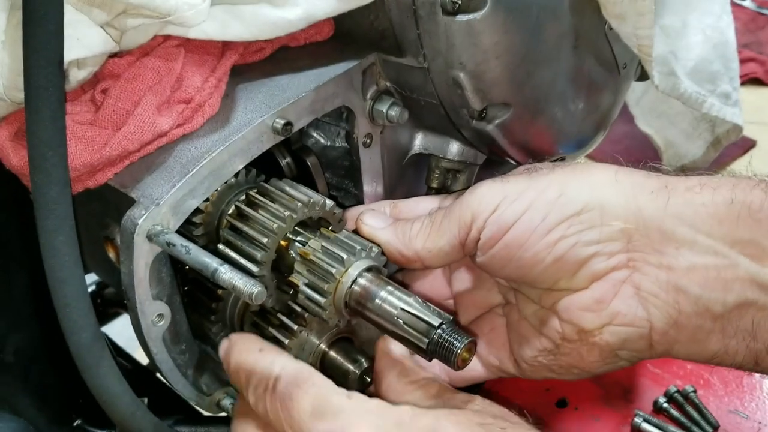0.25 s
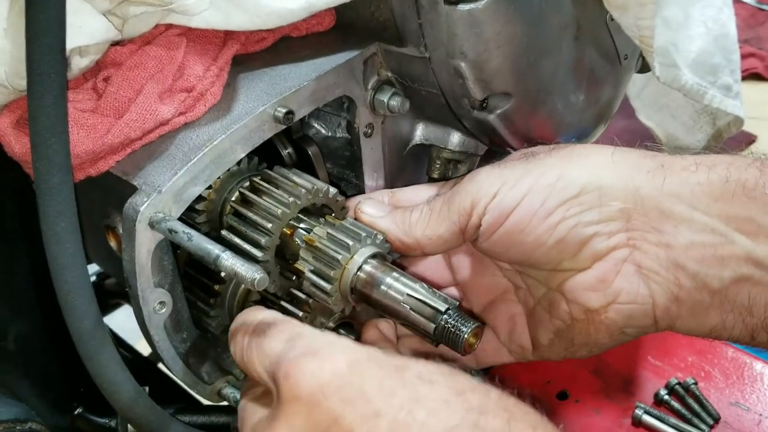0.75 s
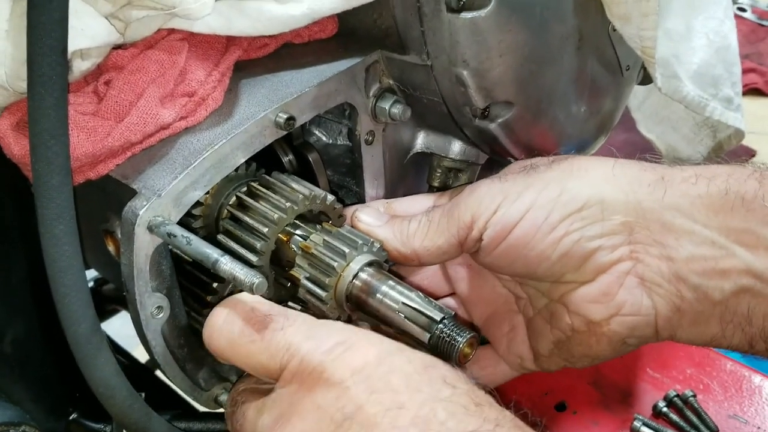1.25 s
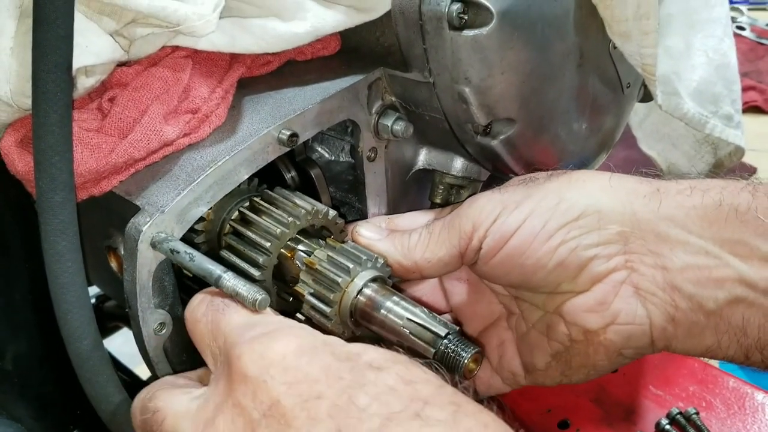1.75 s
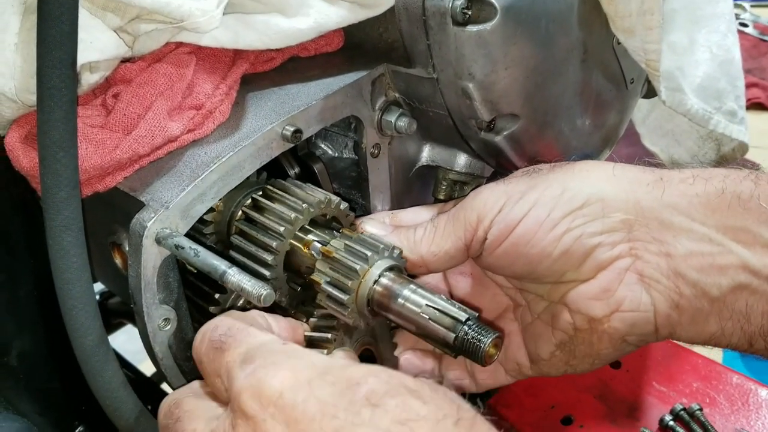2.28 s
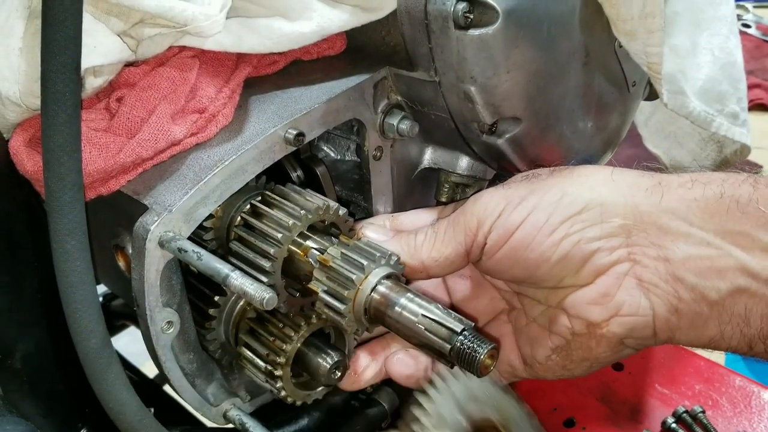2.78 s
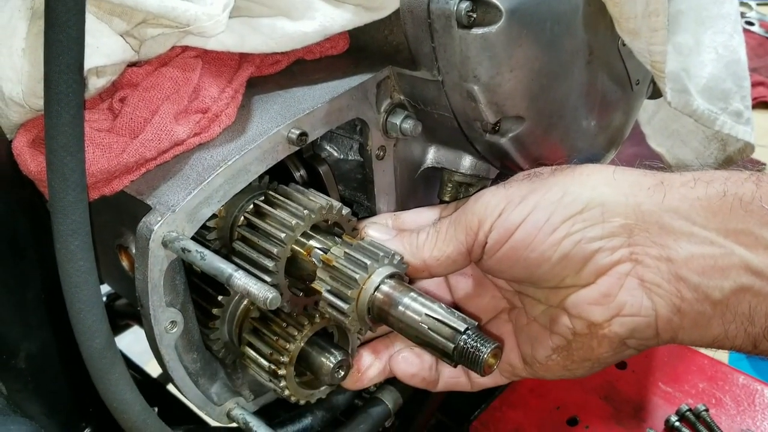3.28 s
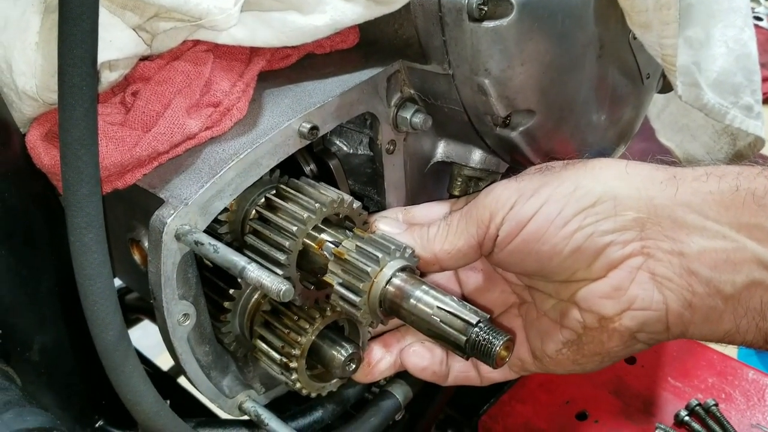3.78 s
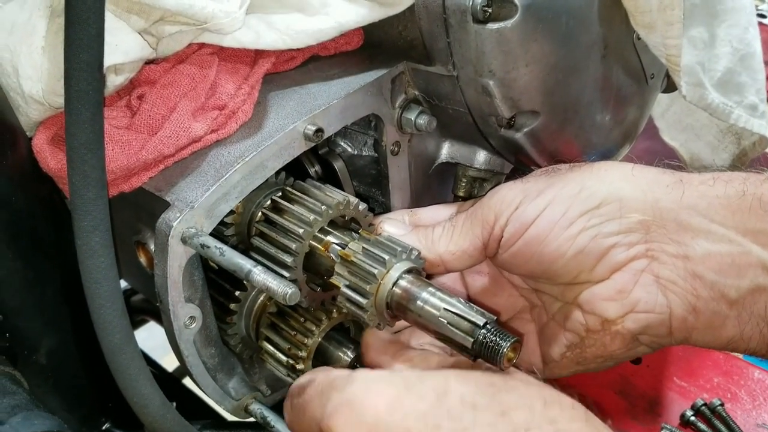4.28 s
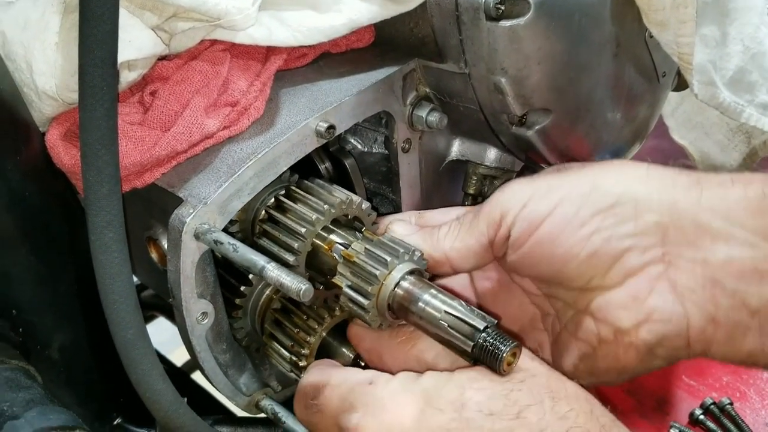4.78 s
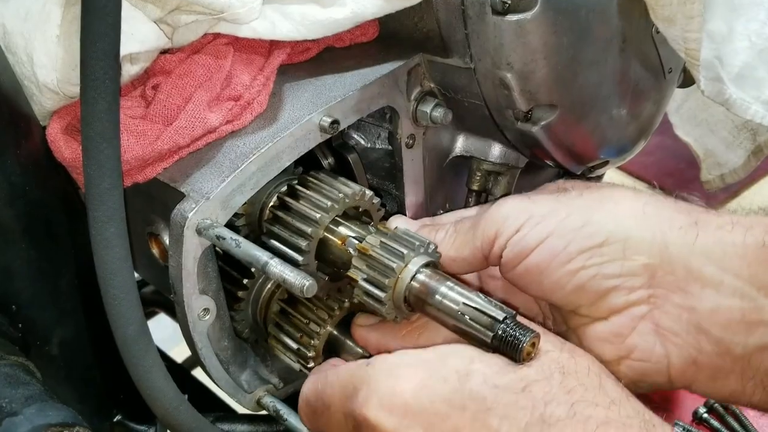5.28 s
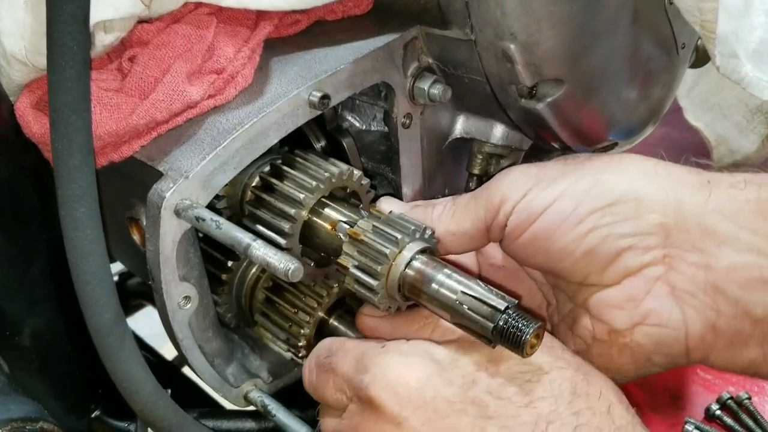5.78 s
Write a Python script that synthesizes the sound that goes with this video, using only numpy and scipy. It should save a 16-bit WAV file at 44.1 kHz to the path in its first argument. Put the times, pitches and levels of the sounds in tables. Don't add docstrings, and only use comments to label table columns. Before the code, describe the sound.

Oily steel gears and shafts click, scrape and clink against a metal casing, with one hollow thud as a gear is put down nearby.

```python
import sys
import numpy as np
from scipy import signal
from scipy.fft import rfft, irfft, next_fast_len
from scipy.io import wavfile
from scipy.ndimage import map_coordinates

SR = 44100
rng = np.random.default_rng(int(sys.argv[2]) if len(sys.argv) > 2 else 0)


def inscribe(sig):
    pcm = np.round(np.clip(np.atleast_2d(sig).T, -1, 1) * 32767)
    wavfile.write(sys.argv[1], SR, pcm.astype(np.int16))


def voltage_ratio(decibels):
    exponent = np.asarray(decibels, float) / 20
    return 10 ** exponent


N = 266364
LEAD_SAMPLES = 8
HALVES = np.array([[.5], [-.5]])


def unit(x):
    return x / np.sqrt(np.mean(x ** 2) + 1e-20)


def along(points, hz):
    f, v = np.transpose(points)
    return np.interp(np.log(hz + 1), np.log(f + 1), v)


def wobble(knots_hz):
    return map_coordinates(rng.standard_normal(int(N * knots_hz / SR) + 4), [np.arange(N) * knots_hz / SR])


def filtered(x, response):
    m = next_fast_len(N + SR // 2)
    return irfft(rfft(x, m) * response(np.fft.rfftfreq(m, 1 / SR)), m)[..., :N]


def body(x, modes, turns):
    def response(f):
        ring = 0
        for k, (hz, width_hz, db) in enumerate(modes):
            damping = 1j * f * width_hz
            ring = ring + (-1) ** k * voltage_ratio(db) * damping / (hz * hz - f * f + damping)
        ring = ring * np.abs(ring) ** turns
        return ring / np.sqrt(np.mean(np.abs(ring) ** 2))
    return filtered(x, response)


def pair(size, alike):
    common, left, right = rng.standard_normal((3, size + LEAD_SAMPLES))
    share = np.clip(alike, 0, 1)
    shared = np.array([common[LEAD_SAMPLES:], common[:size]])
    own = np.array([left[:size], right[:size]])
    return np.sqrt(share) * shared + np.sqrt(1 - share) * own


def blows(rows, extra, gain_db, rise, stretch, alike, focus):
    force = np.zeros((2, N + SR))
    for s, db, hz, extra_db, pan_db, length_s in rows:
        t = np.arange(int(SR * min(stretch * length_s, 1 / 3))) / SR
        push = pair(len(t), alike)
        peak = signal.iirpeak(hz, 4, SR)
        spot = signal.lfilter(*peak, signal.lfilter(*peak, push))
        soft_start = (1 - np.exp(-t / (rise * length_s))) ** 2
        shape = soft_start * voltage_ratio(-60 * t / (stretch * length_s))
        push = (push + focus * spot) * shape
        push = push * np.linalg.norm(shape) / np.linalg.norm(push, axis=1, keepdims=True) / shape.max()
        level_db = db + extra * extra_db + gain_db + HALVES * pan_db
        force[:, round(s * SR):][:, :len(t)] += voltage_ratio(level_db) * push
    return force[:, :N]


def strokes(rows, upper):
    grip_s, ease_db, let_go_t60_s = 0.0051, 2, 0.33
    t = np.arange(0, N / SR, .002)
    gain = np.zeros(len(t))
    for start_s, length_s, db, over_db in rows:
        since = t - start_s
        easing_db = ease_db * np.clip(since / length_s, 0, 1)
        dying_db = 60 * np.maximum(since - length_s, 0) / let_go_t60_s
        swell = np.clip(since / grip_s, 0, 1)
        gain += voltage_ratio(db + upper * over_db - easing_db - dying_db) * swell
    return np.interp(np.arange(N) / SR, t, gain)


def rubbing(rows, upper, gain_db, grit_db, alike):
    grit = unit(voltage_ratio(grit_db * (wobble(300) + wobble(53))))
    return voltage_ratio(gain_db) * strokes(rows, upper) * grit * pair(N, alike)


# f/Hz, density/dB per Hz
AIR = [(15, -45), (25, 0), (53, -11.5), (87, -1), (170, -13.5), (270, -18), (560, -24), (1840, -25),
       (6600, -26.5), (8600, -34.5), (11000, -30), (14900, -28), (15900, -30), (16300, -66.5)]
# f/Hz, correlation
ALIKE = [(60, 1), (240, 0.27), (950, 0.0073), (3770, -0.2), (15000, 0.34)]


def air():
    def mid_side(hz):
        turn = np.arccos(np.clip(along(ALIKE, hz), -1, 1)) / 2
        return voltage_ratio(along(AIR, hz)) * np.array([np.cos(turn), np.sin(turn)])
    mid, side = filtered(rng.standard_normal((2, N)), mid_side)
    level_db = -67.5 + 0.067 * wobble(0.69)
    return voltage_ratio(level_db) * np.array([mid + side, mid - side]) / np.std(mid)


# f/Hz, width/Hz, level/dB
GEAR = [(3250, 1530, 1), (4391, 560, 4), (4694, 430, 3.5), (5910, 340, -0.5), (6060, 340, -1.5),
        (6670, 850, 1), (7610, 370, -0.5)]
# f/Hz, width/Hz, level/dB
TOOTH = [(11050, 6700, 0.5), (12330, 1650, 7.01), (14870, 2100, 2.7)]


def gear_and_tips(gear_force, tip_force):
    return body(gear_force, GEAR, turns=0.12) + body(tip_force, TOOTH, turns=0.38)


def strike_teeth(rows):
    gear = blows(rows, False, gain_db=-7, rise=0.013, stretch=0.91, alike=0.358, focus=1.4)
    tips = blows(rows, True, gain_db=0.5, rise=0.052, stretch=0.84, alike=0.065, focus=0)
    return gear_and_tips(gear, tips)


# t/s, length/s, gear level/dB, tips over gear/dB
SLIDES = [(.34, 0.0555, -71, 7), (.45, 0.333, -84.5, 13), (1.005, 0.027, -66, -2), (1.06, 0.062, -63.5, -1),
          (1.15, 0.072, -72.5, 5), (1.57, 0.11, -79.5, 12), (2.0, 0.041, -74, 12), (2.27, .1, -93.5, 4),
          (3.84, 0.2, -77.5, 10), (3.91, 0.11, -75, 10), (4.05, 0.3, -91.5, 22.5),
          (4.37, 0.11, -91.5, 18.5), (4.59, 0.13, -78, 10), (4.71, 0.31, -72.5, 8), (4.9, 0.25, -70.5, 5.5),
          (5.14, 0.11, -63, 6), (5.28, 0.17, -73, 2), (5.6, .08, -70, -2), (5.87, 0.025, -70, -4.5)]


def slides():
    gear = rubbing(SLIDES, False, gain_db=3.0, grit_db=2.0, alike=0.48)
    tips = rubbing(SLIDES, True, gain_db=-2.5, grit_db=3.0, alike=0.31)
    return gear_and_tips(gear, tips)


# f/Hz, width/Hz, level/dB
CASING = [(126.8, 29, -0.5), (194.3, 28.4, -0.5), (292, 132, -3), (508.9, 104, -4), (640, 118, -7)]
# f/Hz, width/Hz, level/dB
SHAFT = [(900, 130, -2.5), (1320, 340, 1), (1980, 424, 1), (2530, 370, -0.5), (3190, 800, -13)]


def casing_and_shaft(casing_force, shaft_force):
    return body(casing_force, CASING, turns=0.26) + body(shaft_force, SHAFT, turns=0.18)


def strike_shafts(rows):
    casing = blows(rows, True, gain_db=1.0, rise=0.073, stretch=3.04, alike=0.75, focus=0)
    shaft = blows(rows, False, gain_db=-4.0, rise=0.008, stretch=1.0, alike=0.42, focus=4.33)
    return casing_and_shaft(casing, shaft)


# t/s, length/s, casing level/dB, shaft over casing/dB
HANDLING = [(.35, 0.19, -67, -19), (.62, 0.115, -67, -32.5), (1.03, 0.1, -59.5, -9.5),
            (1.15, 0.067, -73, -11.5), (1.7, 0.114, -68, -37.5), (2.27, 0.181, -59, -31.5),
            (2.44, 0.11, -72, -23), (3.84, 0.114, -79, -14.5), (3.945, 0.051, -69, -15.5),
            (4.37, 0.303, -74.5, -27), (4.75, 0.48, -73.5, -24), (4.87, 0.14, -73, -10),
            (5.0, 0.119, -68, -13), (5.14, 0.16, -61, -17.5), (5.63, 0.14, -66, -12),
            (5.88, 0.025, -61, -20)]


def handling():
    casing = rubbing(HANDLING, False, gain_db=-4.5, grit_db=1.5, alike=0.74)
    shaft = rubbing(HANDLING, True, gain_db=16.5, grit_db=1.0, alike=0.28)
    return casing_and_shaft(casing, shaft)


# t/s, ring level/dB, strongest ring f/Hz, tips over ring/dB
BURRS = [(.354, -62, 6500, 4), (.357, -62, 6800, 4), (.361, -62, 6800, 6), (.3638, -52, 6800, 3),
         (.371, -64, 6800, 8), (.3775, -62, 7000, 8), (.381, -62, 6800, 8), (.3905, -60, 6500, 8),
         (.394, -62, 6500, 8), (.6065, -60, 6500, 4), (.6235, -62, 5000, 12), (1.687, -66, 7000, 14),
         (1.998, -58, 7400, 10), (3.9545, -50, 4900, -6), (3.981, -51, 4900, -4), (4.724, -56, 6500, 0),
         (4.7272, -58, 6000, 4), (4.778, -60, 6500, 4), (4.9625, -50, 4500, 6), (4.994, -52, 3300, -4),
         (5.09, -58, 6000, 0), (5.143, -48, 6500, 4), (5.2226, -55, 7500, 12), (5.226, -57, 7500, 10),
         (5.284, -58, 7000, 4), (5.4245, -55, 6200, 10)]


def burrs():
    pan_db, push_s = 0, .003
    return strike_teeth([(*row, pan_db, push_s) for row in BURRS])


# t/s, ring level/dB, strongest ring f/Hz, tips over ring/dB
TICKS = [(0.3626, -53.5, 6800, -4), (0.377, -63, 7660, 5), (0.39, -68, 6340, 9.5), (0.511, -55.5, 3970, -9),
         (0.621, -60.5, 4580, 10), (0.841, -55, 3800, -8.5), (1.6466, -57.5, 3550, -2),
         (1.6848, -65.5, 6700, 13.5), (1.9961, -51.5, 7460, 10.5), (4.23, -71.5, 5700, 9),
         (4.4632, -55, 6400, -7.5), (4.9617, -53, 3570, 1), (5.0961, -58, 7400, 6), (5.1243, -58, 7600, 6),
         (5.222, -59, 3960, 4), (5.3123, -70, 6505, 2.5), (5.4223, -46.5, 6210, 2.5)]


def ticks():
    pan_db, push_s = 1.5, 0.025
    return strike_teeth([(*row, pan_db, push_s) for row in TICKS])


# t/s, level/dB, strongest ring f/Hz, casing over it/dB, length/s
DRAGS = [(0.43, -68, 2300, -9, 0.16), (1.644, -68.5, 2330, -40, 0.23), (1.807, -49, 2190, -27, 0.042),
         (2.434, -64.5, 1660, -15.5, 0.1), (2.469, -59.5, 965, -11.5, .1),
         (2.438, -64.5, 1220, -30.5, 0.36), (2.543, -60, 1330, -13.5, 0.14),
         (5.593, -67, 1290, 25.5, 0.079), (5.618, -53, 2200, 0, 0.12), (1.011, -67, 1350, -28.5, 0.18),
         (1.073, -60, 1240, -31, 0.297), (1.289, -71.5, 1220, -25, 0.11)]


def drags():
    pan_db = 4
    return strike_shafts([(*row, pan_db, length_s) for *row, length_s in DRAGS])


# t/s, level/dB, strongest ring f/Hz, length/s
THUMPS = [(.445, -73.5, 489, 0.073), (.52, -71, 159, 0.0305), (.522, -68, 437, 0.015),
          (1.052, -59.5, 131.8, 0.022), (1.06, -63.5, 780, 0.085), (1.141, -67, 820, .06),
          (1.155, -68, 153, 0.037), (1.811, -84.5, 503, .05), (2.562, -70, 855, 0.043),
          (2.29, -74, 243, 0.15), (2.476, -73.5, 628, 0.11), (2.545, -76, 457, 0.0374),
          (3.576, -71.5, 660, 0.021), (4.404, -68, 153, 0.031), (4.465, -78.5, 139, 0.09),
          (4.642, -66, 420, 0.0195), (4.663, -78, 272, 0.04), (4.422, -80, 243.4, 0.12),
          (5.014, -61.5, 737, 0.0506), (4.715, -82.5, 509, 0.047), (4.9, -65, 144, 0.022),
          (4.955, -69, 126.5, 0.0368), (4.96, -70.5, 259, 0.041), (5.223, -74, 211.6, 0.0384),
          (5.575, -79, 400, .04), (5.595, -62.5, 525, .015), (5.607, -53, 640, 0.019),
          (5.64, -70, 530, 0.066), (5.921, -68, 500, 0.011), (5.606, -65, 287, 0.02),
          (5.625, -66, 209.8, 0.12), (5.681, -80, 323, 0.108), (5.735, -77, 400, 0.06),
          (5.931, -71.5, 140, 0.027)]


def thumps():
    rows = [(s, db, hz, 0, 0, length_s) for s, db, hz, length_s in THUMPS]
    force = blows(rows, False, gain_db=0.5, rise=0.069, stretch=2.2, alike=0.95, focus=100)
    return body(force, CASING, turns=0.26)


# t/s, clack level/dB, strongest ring f/Hz, casing over clack/dB
SHOVES = [(0.475, -53, 1840, -23), (0.6783, -59.5, 1140, -5), (0.9368, -68, 1170, -5.5),
          (1.063, -40, 1232, -11.5), (1.1043, -55.5, 1144, -3), (1.8102, -52.5, 1314, -15),
          (2.0178, -60, 1081, -25.5), (2.4025, -69, 1320, -10.5), (2.4425, -61, 1237, -9),
          (2.4811, -61.5, 1250, -5), (2.5527, -58.5, 1110, -13), (4.8743, -61.5, 2340, 1.5),
          (4.904, -61.5, 1400, 0.5), (4.9913, -55.5, 1360, -1), (5.035, -57, 1220, -7.5),
          (5.9215, -53, 1270, -4)]


def shoves():
    pan_db, push_s = 2.5, 0.068
    return strike_shafts([(*row, pan_db, push_s) for row in SHOVES])


# t/s, level/dB, f/Hz, t60/s
RINGS = [(0.5005, -55.5, 1250, 0.122), (0.5, -46, 2000, .04), (0.68, -58.5, 1400, 0.074),
         (1.048, -43.5, 1360, 0.057), (1.046, -34.5, 2527, .035), (1.0635, -32.5, 2552, 0.0595),
         (1.085, -57.5, 2490, .2), (1.105, -48.5, 1227, 0.105), (1.125, -55, 2350, .04),
         (1.149, -48, 1287, 0.091), (1.156, -52, 888, 0.078), (1.211, -55.5, 3716, 0.035),
         (4.877, -58, 2242, 0.275), (4.9047, -57, 3000, 0.037), (4.989, -54, 3230, .05),
         (5.021, -33, 1331, 0.027), (5.157, -45, 1370, 0.046), (5.6085, -35.5, 2360, 0.041),
         (5.608, -42.5, 2100, 0.05), (5.608, -38, 4532, 0.028), (5.613, -44, 3900, 0.07),
         (5.874, -53, 1478, 0.07), (0.475, -53, 1500, .05), (0.475, -54, 2290, 0.041),
         (1.81, -56, 1333, 0.113), (2.447, -53, 1293, .05), (4.96, -54, 2260, 0.1),
         (5.873, -51, 2300, 0.038), (5.885, -51.5, 1141, 0.074), (2.287, -59, 1387, 0.087),
         (2.482, -63, 1260, .1), (2.555, -57, 1400, 0.077), (1.148, -53.5, 451.3, 0.089),
         (1.064, -43.5, 1243, 0.108), (5.924, -53, 1250, 0.069), (1.0436, -20, 7550, .014),
         (1.0458, -42, 14700, .035), (1.0505, -25.5, 7000, .015), (1.059, -32.5, 7000, .015),
         (1.8105, -58, 6880, 0.088), (5.0235, -34, 1340, .018), (5.032, -45, 1340, 0.033),
         (4.6445, -43.5, 440, .04), (4.653, -52, 390, .04), (5.609, -33, 287, 0.047),
         (5.615, -34, 168, 0.084), (5.65, -45, 210, .14), (5.735, -52.5, 230, .1), (3.97, -62, 4400, .15)]
# f/Hz, left-right/dB
RING_PAN = [(300, 1), (600, 1), (1300, 11), (2300, 1.5), (4000, 4), (7000, 5), (15000, 4)]


def rings():
    rise_s, split = .0015, .025
    out, t = np.zeros((2, N + SR)), np.arange(SR // 4) / SR
    for s, db, hz, t60_s in RINGS:
        start, skew, twin_start = rng.random(3)
        port_phase = HALVES * (2 * np.pi * hz * LEAD_SAMPLES / SR + skew - .5)
        phase = 2 * np.pi * start + port_phase
        mode = np.sin(2 * np.pi * hz * t + phase)
        twin = .5 * np.sin(2 * np.pi * (hz * (1 + split) * t + twin_start) + phase)
        level_db = db - 60 * t / t60_s + HALVES * along(RING_PAN, hz)
        shape = voltage_ratio(level_db) * (1 - np.exp(-t / rise_s))
        out[:, round(s * SR):][:, :len(t)] += shape * (mode + twin)
    return out[:, :N]


# t/s, ring level/dB, strongest ring f/Hz, left-right/dB
MESHES = [(1.0626, -28, 5060, 0), (1.8102, -56.5, 3500, 0), (0.499, -59, 5000, 0), (1.2093, -45, 3680, 6),
          (2.051, -58.5, 3540, 3), (2.282, -56, 6750, 0.5), (2.2945, -52.5, 6750, 1),
          (2.446, -53.5, 6872, -4.5), (3.955, -46.5, 4960, -5), (4.9033, -51.5, 3500, 2.5),
          (4.9902, -43, 3210, 2), (5.02, -41.5, 3170, -1.5), (5.0961, -42, 7400, -5),
          (5.1549, -32, 4540, 6), (5.161, -35, 4960, 1), (5.6093, -32, 3250, -1.5), (5.625, -47, 5500, -2)]


def meshes():
    tip_db, tip_lag, firm_db, push_s = -15, 0.987, -39, 0.041
    rows = []
    for s, db, hz, pan_db in MESHES:
        lag_db = tip_lag * max(db - firm_db, 0)
        rows.append((s, db, hz, tip_db - lag_db, pan_db, push_s))
    return strike_teeth(rows)


# t/s, clack level/dB, strongest ring f/Hz, casing over clack/dB
TAPS = [(0.4996, -44, 2232, -14), (0.536, -62.5, 1210, 2.5), (1.0348, -48, 1410, -9),
        (1.1535, -43, 950, -13.5), (1.2085, -53, 1230, -4), (1.476, -64, 1215, -20),
        (1.649, -68.5, 2200, -10), (2.276, -57.5, 1393, -8), (2.288, -54.5, 1370, -2),
        (1.0456, -34.5, 2430, -13.5), (5.02, -38, 1390, -24), (4.4638, -67, 2260, -6),
        (4.6405, -63.5, 1460, 11.5), (5.1565, -44, 1320, -27), (5.6088, -31, 2333, -5),
        (5.866, -52, 1495, -14), (5.8725, -41, 1520, -14), (5.9068, -48, 1400, -10)]


def taps():
    pan_db, push_s = -0.5, 0.023
    return strike_shafts([(*row, pan_db, push_s) for row in TAPS])


CLINK_DB = -30.5
# t/s, level/dB, f/Hz, tips over ring/dB, left-right/dB, push/s
CLINK = [
    (1.034, CLINK_DB - 18, 6800, -30, 6, .02),
    (1.0452, CLINK_DB, 4300, -26, 0, .022),
    (1.0505, CLINK_DB + 1, 7000, -30, 6, .015),
]


def clink():
    return strike_teeth(CLINK)


# f/Hz, level/dB
RIM = [(2700, -29), (4400, -31), (6200, -20), (6650, -26.5), (7100, -18), (7600, -26), (14900, -40)]


def rim():
    peak_s, rise_s, fall_s = 1.0473, .0013, .0011
    t = np.arange(N) / SR - peak_s
    swell = np.exp(-.5 * (t / np.where(t < 0, rise_s, fall_s)) ** 2)
    ring = sum(voltage_ratio(db) * np.cos(2 * np.pi * hz * t) for hz, db in RIM) * swell
    return np.array([ring, voltage_ratio(-9) * np.roll(ring, LEAD_SAMPLES)])


# t/s, level/dB, t60/s
WASHER = [(1.05, -69, 0.116), (1.075, -83, .6), (1.33, -68, 0.11), (1.62, -77, .2), (1.75, -81, .12),
          (2.015, -76, .08), (2.286, -78.5, 0.18), (2.447, -55, 0.148), (2.556, -63.5, 0.073),
          (3.559, -63.5, 0.054), (3.593, -56, 0.15)]


def washer():
    hz, width_hz, wind_up = 6866, 57, 0.85
    shiver = unit(body(rng.standard_normal(N), [(hz, width_hz, 0)], turns=0.75))
    t = np.arange(N) / SR
    shaken = np.zeros(N)
    for s, db, t60_s in WASHER:
        away_s = np.maximum(t - s, (s - t) / wind_up)
        shaken += voltage_ratio(db - 60 * away_s / t60_s)
    return shaken * shiver * voltage_ratio([[4], [-5]])


# t/s, ring level/dB, strongest ring f/Hz, length/s
SCUFFS = [
    (1.634, -71.5, 3500, 0.17),
    (3.96, -48.5, 4963, 0.312),
    (5.15, -60, 4800, 0.4),
    (5.6, -49, 5540, 0.21),
]


def scuffs():
    tip_db, pan_db = -17, 0
    return strike_teeth([(*row, tip_db, pan_db, length_s) for *row, length_s in SCUFFS])


# t/s, level/dB of each PANEL mode
SET_DOWN = [
    (3.5761, -22.5, -38, -22.5, -40),
    (3.6013, -34.5, -37.5, -26, -43),
    (3.637, -55, -50, -43, -37),
    (3.655, -53, -50, -49.5, -34.5),
    (3.761, -62.5, -60, -70, -60.5),
    (3.88, -66, -65, -52, -65),
]
# f/Hz, t60/s
PANEL = [(83, 0.074), (128, .08), (200, 0.084), (240, 0.17)]
# f/Hz, width/Hz, level/dB
BENCH = [(124.4, 18.6, -5.5), (193.3, 11, 4), (237, 17.5, -6), (299.3, 44.7, -11), (488, 180, -25.5),
         (690, 100, -33.5)]


def bench():
    thud, rumble = np.zeros(N + SR), np.zeros(N + SR)
    t = np.arange(SR * 3 // 4) / SR
    for s, *levels_db in SET_DOWN:
        ring = np.zeros(len(t))
        for db, (hz, t60_s) in zip(levels_db, PANEL):
            ring += voltage_ratio(db - 60 * t / t60_s) * np.sin(2 * np.pi * hz * t)
        thud[round(s * SR):][:len(t)] += ring * (1 - np.exp(-t / 0.0024))
    landing = round(SET_DOWN[0][0] * SR)
    rumble[landing:][:len(t)] = voltage_ratio(-38 - 60 * t / 0.74) * rng.standard_normal(len(t))

    def deep_cut(hz):
        ratio = hz / 62
        return ((1j * ratio) ** 2 / (1 + 1.1j * ratio - ratio ** 2)) ** 2
    return filtered(thud[:N] + body(rumble[:N], BENCH, turns=0.3), deep_cut)


# t/s, ring level/dB, strongest ring f/Hz, left-right/dB
SNAPS = [
    (3.5815, -56.5, 3500, -3),
    (4.715, -42.5, 5500, -0.5),
    (4.7354, -43.5, 4520, -1.5),
    (4.9621, -45, 3650, 1),
    (5.128, -50, 8100, -2),
    (5.142, -37, 6470, 1.5),
    (5.2213, -51, 7800, 2),
]


def snaps():
    tip_db, push_s = -8, 0.009
    return strike_teeth([(s, db, hz, tip_db, pan_db, push_s) for s, db, hz, pan_db in SNAPS])


# f/Hz, t60/s
WALLS = [(100, .6), (500, .45), (2000, .35), (7000, .3), (14000, .2)]


def walls(x):
    seed = rng.standard_normal((2, SR * 3 // 4))
    hz, t, z = signal.stft(seed, SR, nperseg=256)
    near = np.clip(1 - hz / 900, 0, 1)[:, None]
    z[1] = near * z[0] + np.sqrt(1 - near ** 2) * z[1]
    decay = voltage_ratio(-60 * t / along(WALLS, hz)[:, None])
    tail = signal.istft(z * decay, SR, nperseg=256)[1]
    late = np.pad(x, (300, 0))[None]
    return signal.fftconvolve(late, tail / np.linalg.norm(tail[0]), axes=1)[:, :N]


def scene():
    room = air()
    gears = slides() + burrs() + ticks() + meshes() + clink() + rim() + scuffs() + snaps()
    shafts = handling() + drags() + thumps() + shoves() + taps()
    metal = gears + shafts + rings() + washer()
    thud = bench()
    echo = walls(voltage_ratio(-13) * metal.mean(0) + voltage_ratio(-12) * thud)
    return metal + thud + echo + room


def top_cut(x):
    return signal.sosfilt(signal.butter(12, 16820, fs=SR, output="sos"), x)


def record(dry):
    def band(hz):
        ratio = hz / 55
        bass_cut = (1j * ratio) ** 2 / (1 + 1.4j * ratio - ratio ** 2)
        return bass_cut / (1 + (hz / 15900) ** 120)
    return top_cut(filtered(dry, band))


dry = scene()
out = record(dry)
inscribe(out)
```